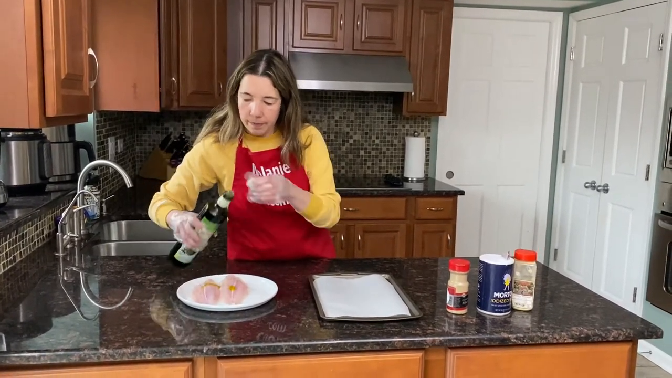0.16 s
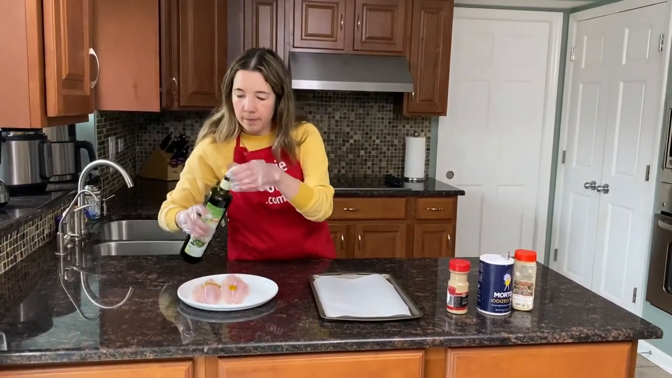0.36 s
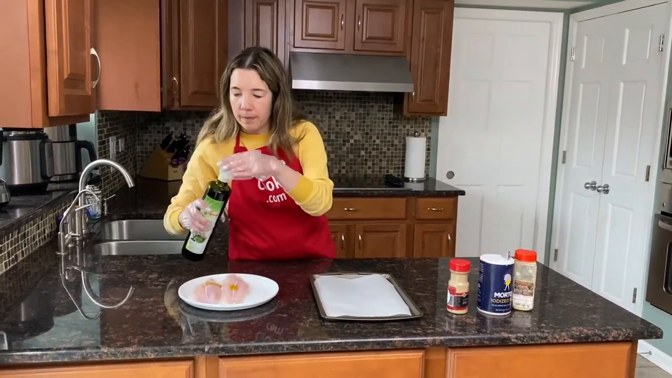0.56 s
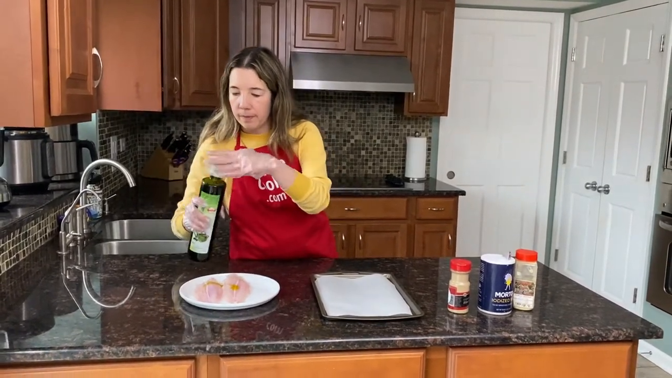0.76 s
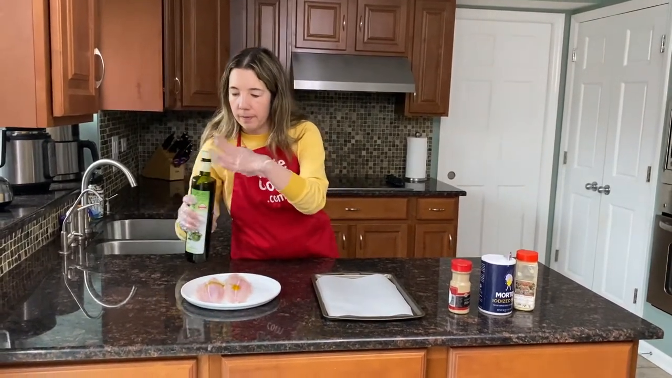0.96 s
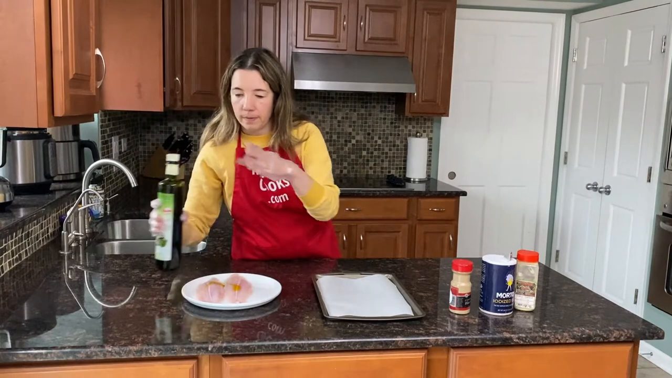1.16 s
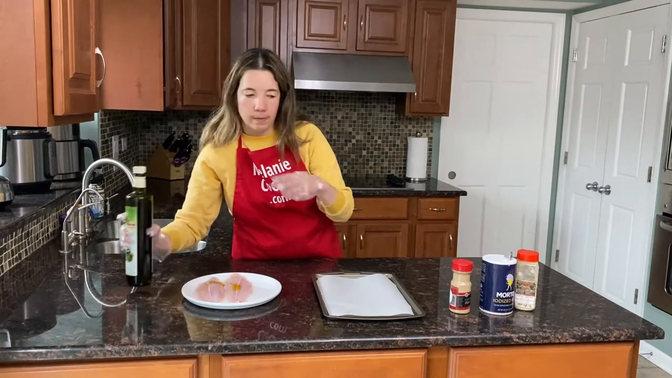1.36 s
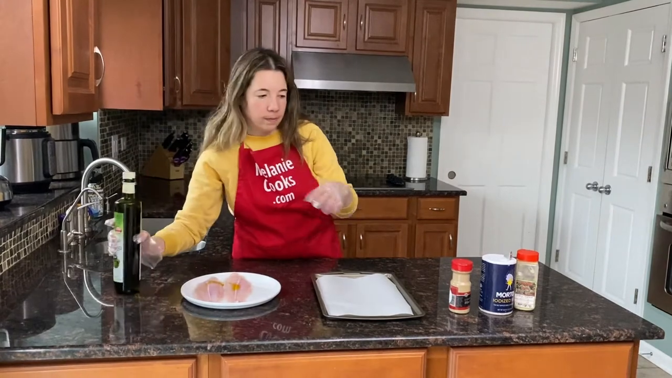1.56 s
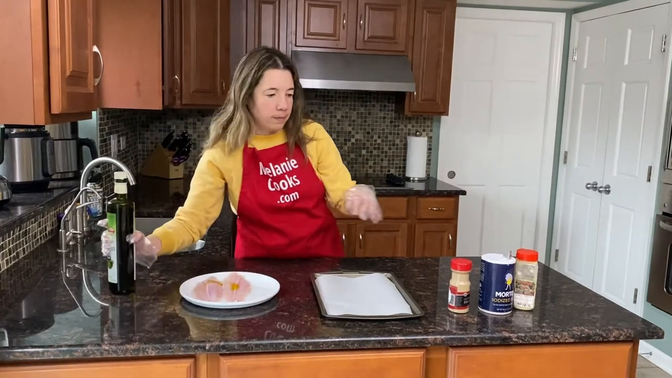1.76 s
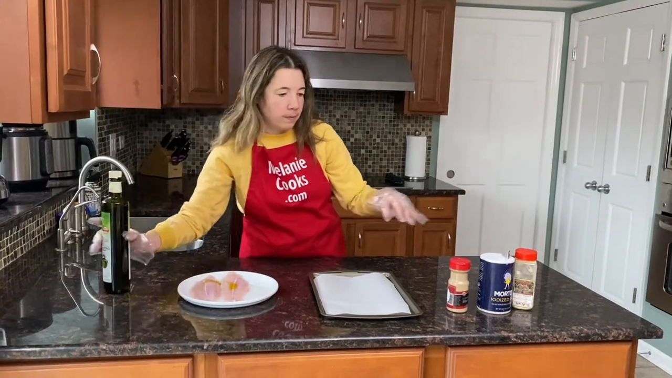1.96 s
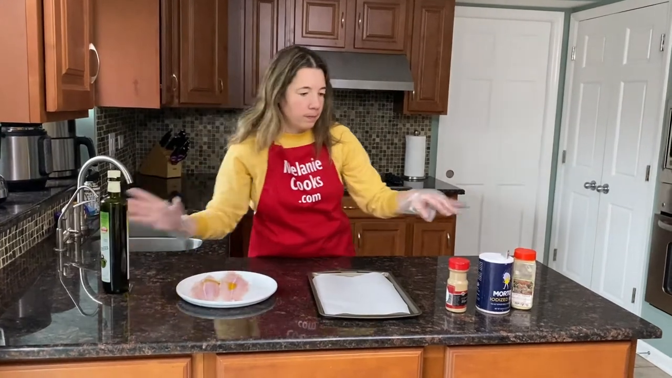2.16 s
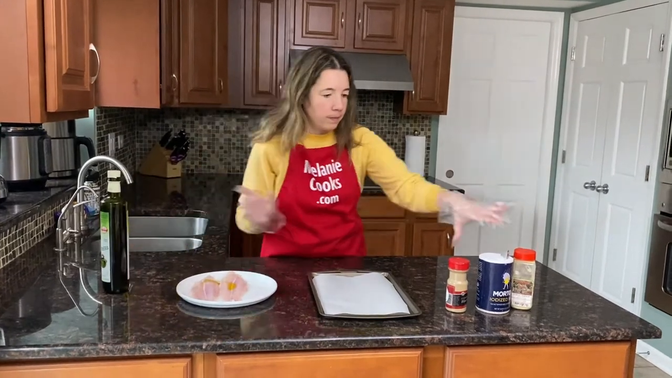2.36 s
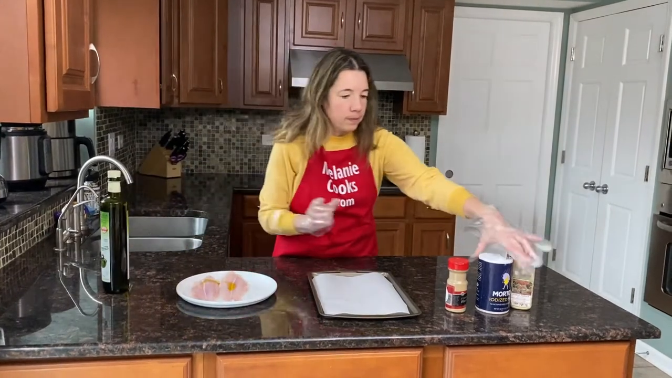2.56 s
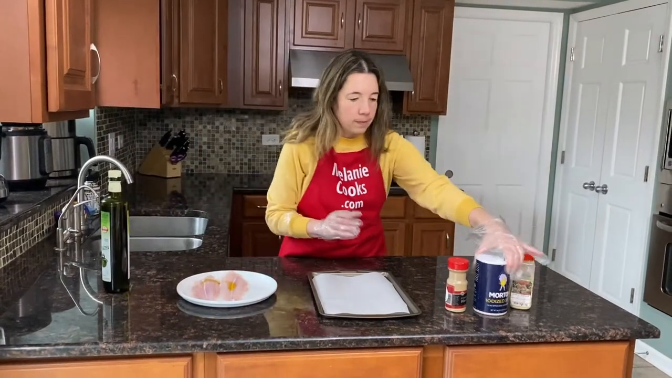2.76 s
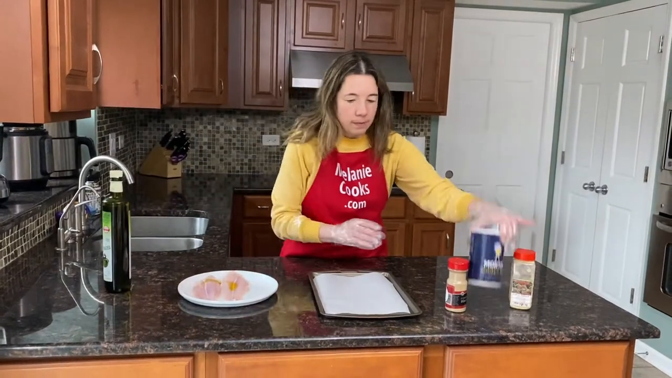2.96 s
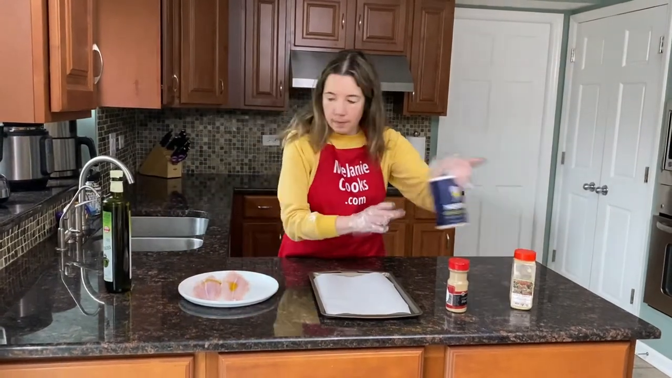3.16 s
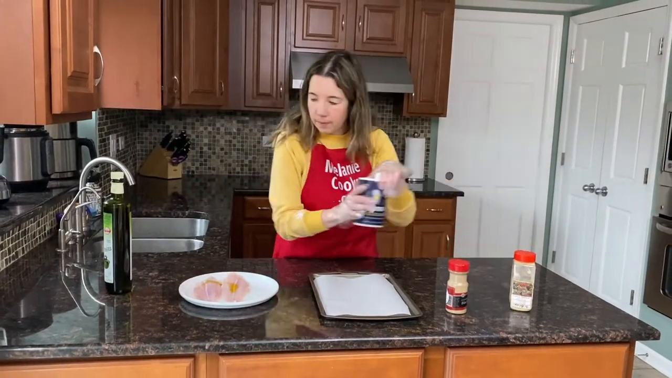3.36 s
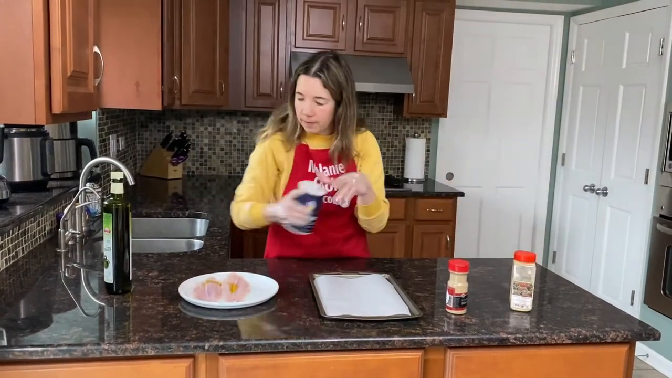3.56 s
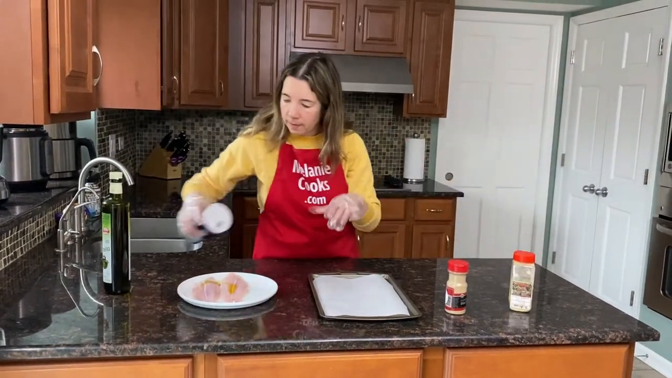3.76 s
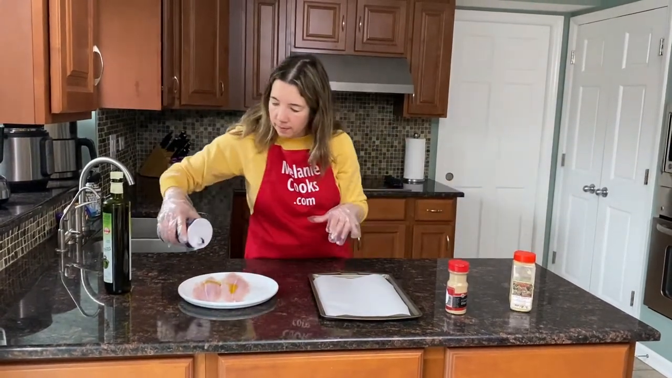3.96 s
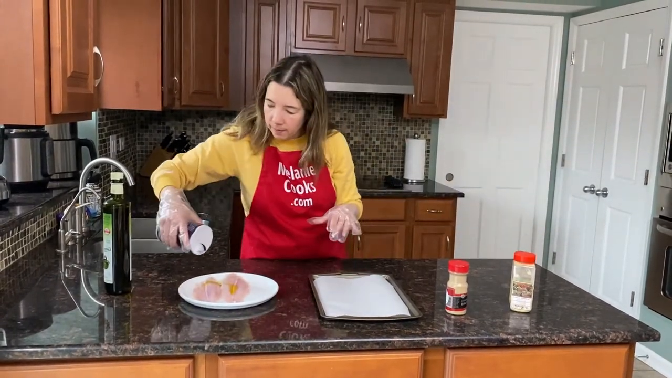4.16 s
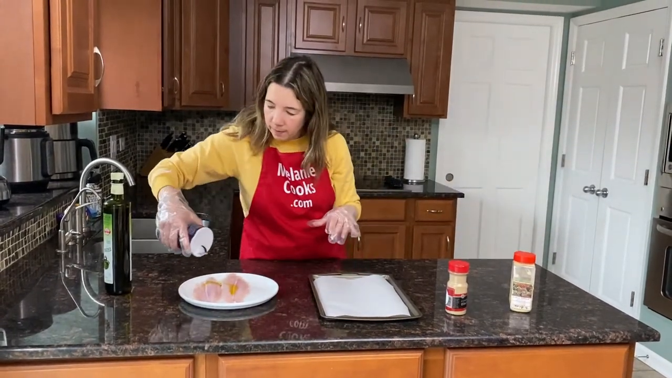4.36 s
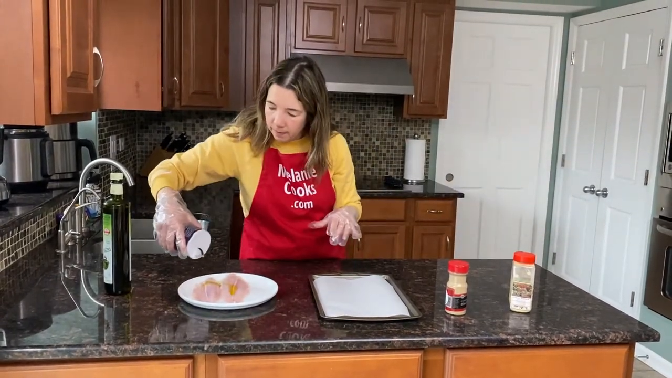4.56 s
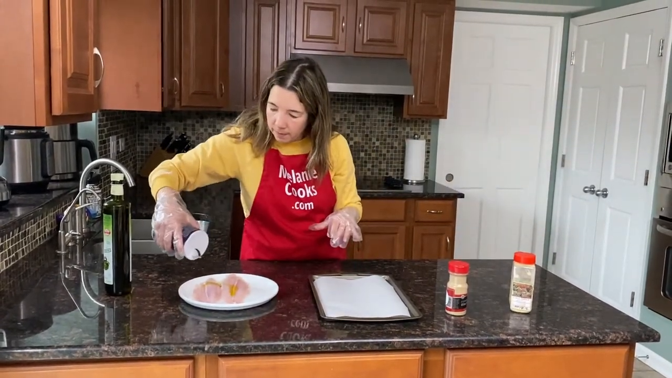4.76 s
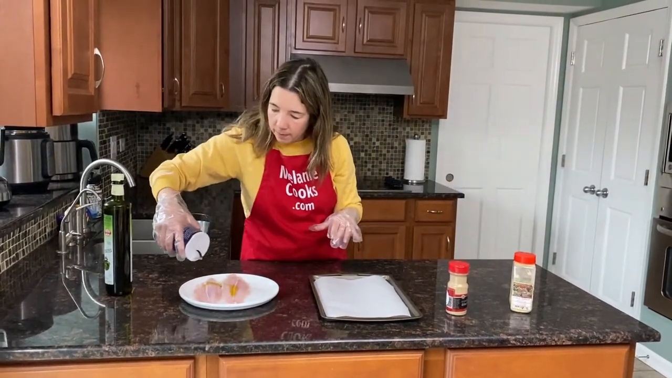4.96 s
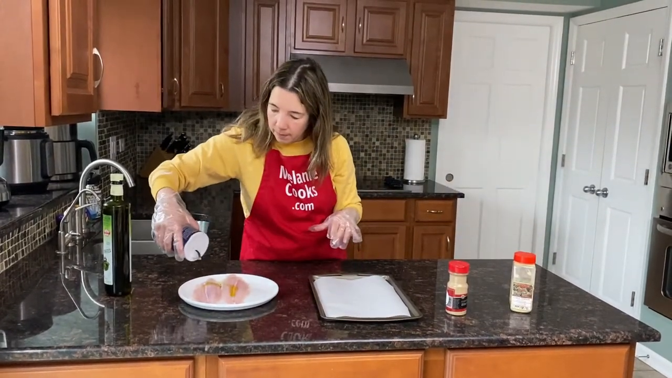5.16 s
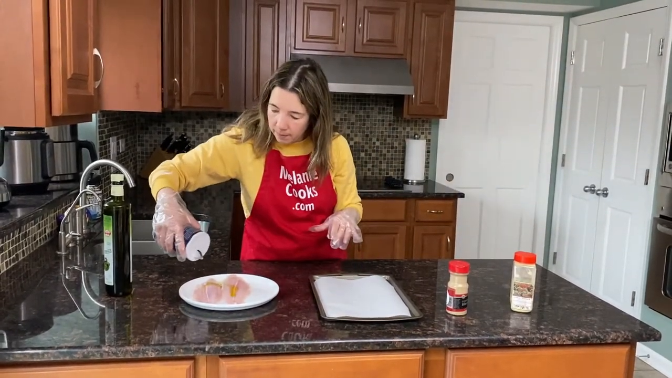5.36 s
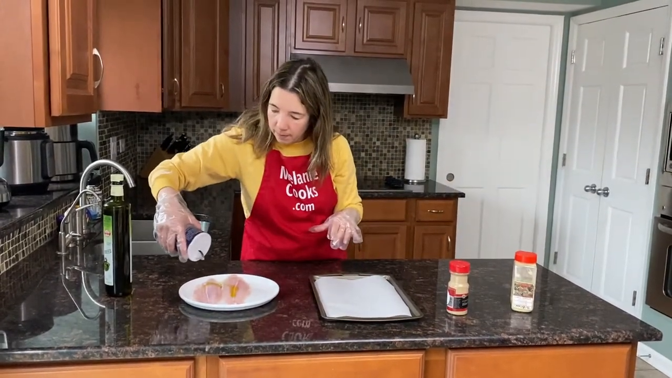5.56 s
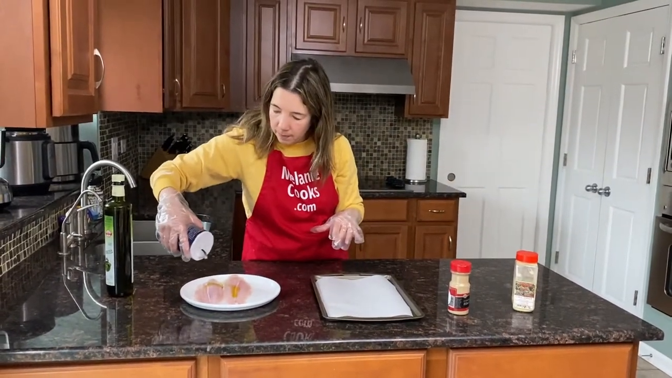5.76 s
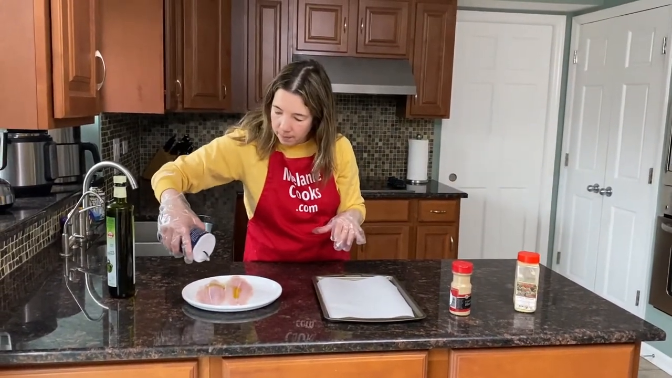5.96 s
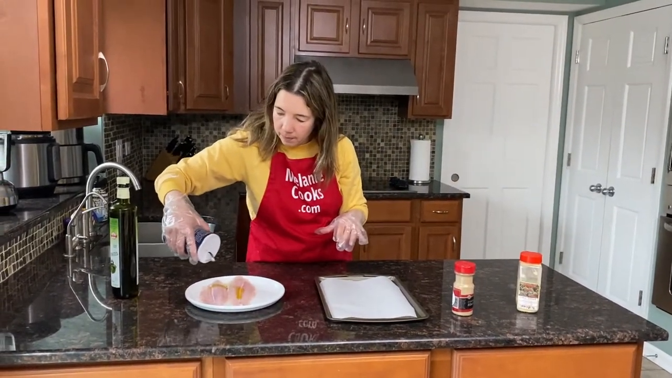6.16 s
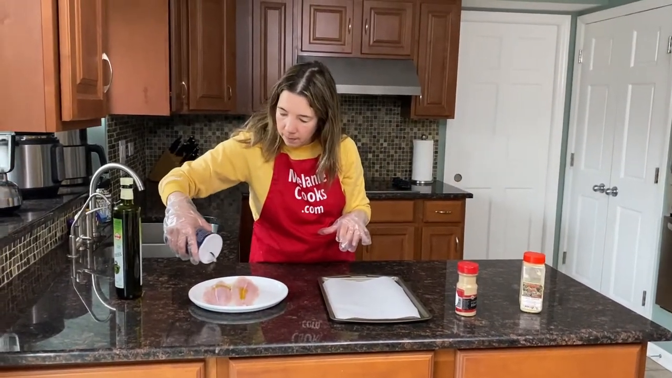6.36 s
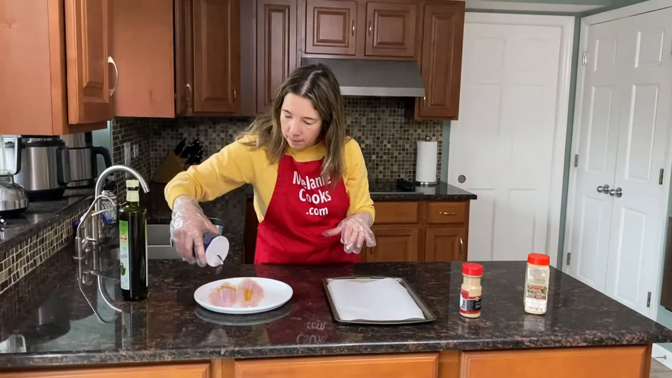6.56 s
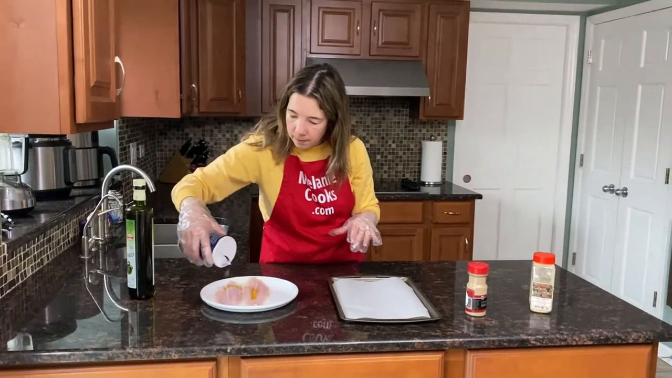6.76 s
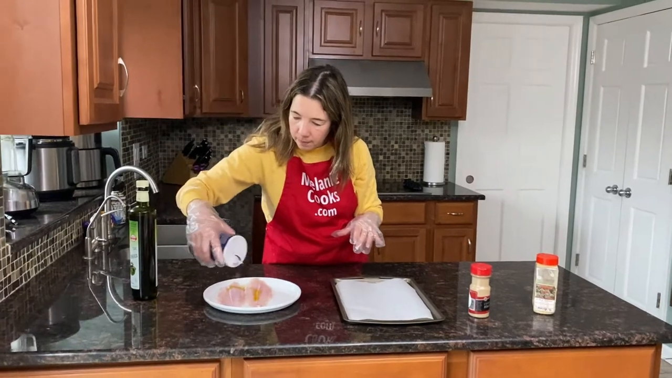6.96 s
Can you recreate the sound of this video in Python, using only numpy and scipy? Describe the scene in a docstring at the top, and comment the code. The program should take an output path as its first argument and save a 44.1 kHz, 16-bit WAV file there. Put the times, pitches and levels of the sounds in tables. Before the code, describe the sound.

A bottle cap scrapes faintly on its thread among soft clothing sounds. Then the glass bottle is set down on a stone counter, clunking and rattling to a stop with a short kitchen echo, by far the loudest event. Sleeves swish, plastic gloves snap lightly and a cardboard canister is picked up. Salt then sprinkles in small, rapid shakes over a faint fridge hum.

```python
"""A fridge hums in a kitchen throughout. Sleeves rustle and thin plastic gloves crackle as a cap is
twisted onto a glass oil bottle. At 1.5 s the bottle lands on a stone worktop and rocks to rest: glass
and stone ring, and the cabinet below booms. With more rustling, fingers bump a cardboard salt canister
and pick it up. From about 4.4 s, flicks of the wrist shake salt over food in small, hissing spurts."""
import sys
import numpy as np
from scipy import signal
from scipy.fft import rfft, irfft, next_fast_len
from scipy.io import wavfile
from scipy.ndimage import map_coordinates

SR = 44100
rng = np.random.default_rng(int(sys.argv[2]) if len(sys.argv) > 2 else 0)


def wrap_up_sound(samples):
    """Save the sound to the file named by the first command line argument, as 16-bit audio."""
    columns = np.atleast_2d(samples).T
    # keep every value between -1 and 1, then stretch to whole-number steps
    tamed = np.clip(columns, -1, 1)
    steps = np.round(tamed * 32767).astype(np.int16)
    wavfile.write(sys.argv[1], SR, steps)


N = 309863

# Levels in dB are relative. A fade time is how long a sound takes to drop by 60 dB.
# The bottle hits the stone. Each row: time in seconds, level in dB, treble cutoff in Hz, clatter in dB.
BOTTLE_HITS = [(1.5067, -32.5, 6000, 15.5), (1.508, -24, 1500, 4.5), (1.5120, -7.5, 850, 4),
               (1.5180, -20.5, 1290, 3), (1.535, -20, 950, 5), (1.573, -38, 800, 10),
               (1.7073, -27.5, 450, 9.5), (1.731, -31.5, 447, 14.5), (1.7781, -23, 870, 2),
               (1.8052, -29, 600, 6.5), (1.8379, -33, 650, 9)]
# Ringing tones. Each row: pitch in Hz, level in dB, fade time in seconds.
WORKTOP_TONES = [(137, -19, 0.62), (185.2, -11, 0.37), (229.5, -14, 0.38), (271.7, -12.5, 0.31),
                 (299.8, 2, 0.15), (367, -11, 0.39), (410, -23, 0.39), (466, -16, 0.29), (506, -15.5, .35),
                 (570, -20, 0.44), (620, -12.5, 0.4), (719, -14.5, 0.31), (768, -14, .32), (818, -23, 0.27),
                 (994, -19, 0.34), (1098, -23, 0.21), (1370, -10, 0.2), (1452, -14, 0.25),
                 (1733, -15, 0.27), (1920, -12, 0.16), (2060, -20, .3), (2600, -21, .25), (3214, -4, 0.073),
                 (4330, -8, 0.089), (5120, -16, .2)]  # bottle and slab together
RIM_TONES = [(303, 0.5, 0.025), (456, -9, 0.44), (514, -8, 0.17), (958, -24.5, .05), (1660, -28, 0.34),
             (1885, -29, .1)]  # set off by the rolling rim
CABINET_TONES = [(54.6, -34, 0.56), (72.4, -32, 0.45), (99.7, -25.5, 0.21), (124.6, -22, 0.2)]
GLASS_TONES = [(3170, -60, .12), (4350, -46, 0.05), (4370, -48, 0.038), (5100, -51, .04), (5480, -54, .03),
               (8400, -43, 0.035)]
# Short swells of sound. Each row: time of the peak in seconds, level in dB, length in seconds.
RIM_ROLLS = [(1.712, -32, .012), (1.74, -25.5, 0.033), (1.785, -33, 0.016), (1.806, -23, 0.016),
             (1.843, -30.5, 0.011)]
CAP_TWISTS = [(.572, -48, 0.018), (.635, -51, 0.051)]
CANISTER_BUMPS = [(2.62, -61, .08), (2.765, -46, 0.081), (3.355, -54.5, 0.047), (4.035, -62, 0.034),
                  (6.24, -67, 0.04)]
# An arm drags its sleeve. Each row: start, rise time and length in seconds, level in dB, rubbing in dB.
ARM_MOVES = [(-.02, 0.027, 0.2, -53, 1), (0.29, 0.017, 0.043, -57.5, 0), (0.407, 0.015, 0.092, -57.5, 0),
             (0.506, 0.062, 0.29, -48, -0.5), (0.749, .1, 0.22, -47.5, 0.5), (1.105, .03, 0.09, -57.5, -17),
             (1.278, 0.061, 0.11, -53, -8), (1.9, .13, .18, -44.5, 0), (2.242, 0.11, 0.24, -43, -2),
             (2.549, 0.029, 0.33, -44, -0.5), (2.68, 0.063, 0.071, -43, 0), (3.043, 0.11, 0.243, -47, -0.5),
             (3.319, 0.016, .17, -41, 0), (3.485, 0.085, 0.17, -46.5, 0.5), (3.71, 0.032, 0.18, -54, 0),
             (3.99, .03, 0.074, -55, 6.5), (4.07, 0.045, 0.054, -54, -14), (4.186, 0.029, 0.31, -58, -2)]
# A glove crease snaps. Each row: start in seconds, level in dB.
GLOVE_SNAPS = [(0.3176, -40.5), (0.417, -39), (1.3285, -39), (1.4344, -38), (3.3362, -27), (3.7203, -34),
               (3.7387, -32), (3.846, -38), (3.9943, -37), (4.0082, -39), (5.9806, -41), (6.1923, -41.5)]
# How fast the wrist shakes. Each row: time in seconds, flicks per second.
SHAKE_SPEED = [(5.0, 8.88), (5.7, 9.4), (6.3, 8.5), (6.45, 10.8)]
# Loudness over time. Each row: time in seconds, level in dB.
SALT_FLOW = [(4.47, -57.5), (4.68, -64.5), (4.92, -55.5), (5.25, -58), (5.46, -62.5), (5.57, -56),
             (5.69, -78), (5.8, -74), (5.91, -63.5), (6.01, -56.5), (6.25, -54), (6.45, -65), (6.55, -60.5),
             (6.72, -69), (6.85, -57), (7.02, -64.5)]
FRIDGE_WHINE = [(.9, -77), (1.35, -62), (2.2, -67.5), (4.7, -69), (4.87, -60), (5.05, -75), (6.0, -66),
                (6.7, -75)]
# The tones of the fridge's hum. Each row: pitch in Hz, level in dB.
FRIDGE_HUM = [(53.8, -81), (236.9, -72.5), (290.7, -77), (678.3, -72)]
# The tone colour of each noise. Each row: frequency in Hz, level there in dB.
CLATTER_COLOUR = [(40, -40), (110, -24), (220, 2.5), (350, -2), (650, 0.5), (1050, -4.5), (1400, -3.5),
                  (2200, -12.5), (4000, -24), (8000, -18), (15000, -15.5)]
SALT_COLOUR = [(500, -33), (1500, -7.5), (3000, -5), (5000, -5), (7200, -1), (9000, -4.5), (12000, 0.5),
               (14500, -6), (16000, -17)]
CLOTH_COLOUR = [(100, -10), (200, -4.5), (450, -5.5), (800, -3), (1100, -3), (1700, -3), (2200, -2.5),
                (3300, -4), (4500, -2.5), (7000, -2), (12500, 0), (14500, -2.5), (16000, -18)]
GLOVE_COLOUR = [(300, -13), (1500, -4), (4000, -7), (8000, -3), (13000, 6.5), (16000, -13)]
CAP_COLOUR = [(700, -37), (1200, -3), (1600, 6), (2100, -7), (2900, -5), (5000, -28)]
CANISTER_COLOUR = [(60, -9), (130, -12), (190, 17), (280, -6), (600, -4), (1500, -31), (4000, -11)]
AIR_COLOUR = [(15, -37), (30, -19), (38, -2), (50, 2), (90, -4.5), (130, -2), (180, -9.5), (330, -4.5),
              (450, -10.5), (880, -10), (1050, -13.5), (2200, -25.5), (4000, -29.5), (12000, -28.5),
              (16000, -39)]
# How clatter and echo die away. Each row: frequency in Hz, fade time in seconds.
CLATTER_FADE = [(80, 0.34), (300, 0.49), (1000, 0.37), (3000, 0.53), (10000, 0.34)]
ROOM_FADE = [(80, 0.32), (300, 0.36), (1000, 0.79), (3000, 0.58), (10000, 0.39)]
# How alike left and right are. Each row: frequency in Hz, likeness from 0 (unrelated) to 1 (the same).
STEREO_LIKENESS = [(60, 0.86), (300, 0.78), (500, 0.31), (900, 0), (1500, 0.13), (2300, 0.38), (3500, 0.65),
                   (4400, 0.51), (5300, 0.24), (6500, 0.67), (8000, 1)]
# How far the right channel's wave runs ahead of the left. Each row: frequency in Hz, lead in radians.
RIGHT_LEAD = [(0, 0), (7300, 0), (8200, 1.4), (9000, 3.14), (10000, 4.6), (10900, 6.2), (11600, 6.4),
              (13300, 9.4), (14000, 10.6), (14700, 12.5)]


def bottle(ring_db=-4, clatter_db=-9, room_db=-10, scatter_db=2.5, slab_hz=160):
    """The base lands edge first, slaps flat, then rocks from rim to rim with softer blows."""
    out, t = np.zeros((2, N)), clock()[:SR // 2]
    hz, level, fade_s = np.transpose(WORKTOP_TONES)[:, :, None]
    # short waves reach left and right out of step
    skew = stereo_angle(hz) * (-1) ** np.arange(len(hz))[:, None]
    direction = np.where(hz > 400, rng.choice([-1, 1], hz.shape), 1)  # low tones all move with the blow
    tones = direction * fade(t, fade_s) * np.sin(2 * np.pi * hz * t + np.array([skew, -skew]))
    for start, db, cutoff_hz, loose_db in BOTTLE_HITS:
        # countless weaker tones of the worktop and what stands on it
        clatter = fade_by_pitch(noise(CLATTER_COLOUR, len(t)), CLATTER_FADE)
        ring = np.sum(amp(level + scatter_db * rng.standard_normal(hz.shape)) * tones, axis=1)
        blow = amp(ring_db) * ring + amp(clatter_db + loose_db) * clatter
        soften = signal.butter(2, cutoff_hz, fs=SR)  # a longer contact passes less treble
        add(out, start, amp(db) * signal.lfilter(*soften, blow))
    bass_cut = signal.butter(2, slab_hz, "high", fs=SR)  # the stiff slab gives off little bass
    out = signal.lfilter(*bass_cut, out) + rolling_rim()
    return out + amp(room_db) * room_echo(out.mean(axis=0)) + cabinet_boom()


def rolling_rim(roll_db=3):
    """Between blows the base rolls on its rim, feeding a few tones that swell and ring on."""
    push, out = amp(roll_db) * swells(RIM_ROLLS), np.zeros(N)
    for hz, db, fade_s in RIM_TONES:
        carry = fade(1 / SR, fade_s)  # the share left after one sample
        loudness = amp(db) * signal.lfilter([1 - carry], [1, -carry], push)
        out += loudness * np.sin(2 * np.pi * hz * clock() + .2 * wobble(80))
    return out


def cabinet_boom(start_s=1.526, rise_s=0.022):
    """The heavy cabinet under the slab takes the weight and is slow to get moving."""
    t = np.maximum(clock() - start_s, 0)
    return (1 - np.exp(-(t / rise_s) ** 2)) * ringing(CABINET_TONES, t)


def glass_ping(start_s=1.5065):
    """Glass meets stone: the bottle's wall rings for a moment before the oil and the hand still it."""
    return ringing(GLASS_TONES, np.maximum(clock() - start_s, 0))


def salt(first_flick_s=4.36, spurt_s=0.064, trickle_db=-73, flutter_db=0.86, spill_db=-12):
    """Each flick of the wrist slides crystals through the spout; a thin trickle runs in between."""
    t = clock()
    flicks = np.cumsum(curve(SHAKE_SPEED, t)) / SR
    flicks -= np.interp(first_flick_s, t, flicks)  # count from the first flick
    peak_times = np.interp(np.arange(int(flicks[-1]) + 1), flicks, t)
    spurts = swells([(s, curve(SALT_FLOW, s), spurt_s) for s in peak_times])
    pouring = np.clip((t - first_flick_s) / .1 + 1, 0, 1)
    trickle = pouring * np.hypot(amp(trickle_db), amp(curve(SALT_FLOW, t) + spill_db))
    loudness = np.hypot(spurts, trickle) * amp(flutter_db * wobble(50))
    return loudness * coloured(grains(per_second=2000, spread_db=3, share=0.2), SALT_COLOUR)


def sleeves(rustle_db=2, rub_db=-1, flutter_db=1.0, rub_hz=2800, sag_db_per_s=6.5, settle_s=0.094,
            stir_db=-57.5, stir_rub_db=3, stir_start_s=.5, stir_end_s=4.0):
    """Fibres catch and slip as an arm moves, slows and stops. Firm rubbing adds body below the hiss."""
    t = clock()
    settle = lambda end: np.exp(-np.maximum(t - end, 0) / settle_s)
    stir = amp(stir_db) * (t >= stir_start_s) * settle(stir_end_s)  # faint rustle between moves
    hiss_power, rub_power = stir ** 2, (stir * amp(stir_rub_db)) ** 2
    for start, rise, length, db, firm_db in ARM_MOVES:
        age = np.maximum(t - start, 0)
        drag = np.minimum(age / rise, 1) * amp(db - sag_db_per_s * age) * settle(start + length)
        hiss_power += drag ** 2
        rub_power += (drag * amp(firm_db)) ** 2
    fibres = coloured(grains(per_second=2500, spread_db=1.5, share=0.25), CLOTH_COLOUR)
    body = filtered(fibres, lambda hz: 1 / (1 + (hz / rub_hz) ** 4))
    hiss = np.sqrt(hiss_power) * (fibres - body)
    rubbing = amp(rub_db) * np.sqrt(rub_power) * body
    return amp(rustle_db + flutter_db * wobble(45)) * (hiss + rubbing)


def gloves(snap_db=-8, fade_s=0.044):
    """Creases in the thin plastic flip over with a short crackle."""
    out, t = np.zeros((2, N)), clock()[:SR // 4]
    for start, db in GLOVE_SNAPS:
        add(out, start, amp(db + snap_db) * fade(t, fade_s) * noise(GLOVE_COLOUR, len(t)))
    return out


def cap():
    """The cap scrapes on its thread as it is twisted on."""
    return swells(CAP_TWISTS) * coloured(grains(per_second=220, spread_db=2.5, share=0.51), CAP_COLOUR)


def canister():
    """Fingers bump the hollow cardboard canister."""
    return swells(CANISTER_BUMPS) * noise(CANISTER_COLOUR)


def fridge(hum_db=-1, waver_db=3, whine_hz=874, whine_waver_db=2, stray_radians=.7):
    """The fridge hums a little unsteadily, and its wavering whine comes and goes."""
    t, hum = clock(), np.zeros(N)
    for hz, db in FRIDGE_HUM:
        loudness = amp(db + hum_db + waver_db * wobble(10))
        hum += loudness * np.sin(2 * np.pi * hz * t + 1.5 * wobble(22))
    drift = stray_radians * np.array([wobble(40), wobble(40)]) + wobble(8.8)
    whine_db = curve(FRIDGE_WHINE, t) + whine_waver_db * wobble(8.8)
    return hum + amp(whine_db) * np.sin(2 * np.pi * whine_hz * t + drift)


def still_air(level_db=-57):
    """The kitchen's air makes a faint, low noise."""
    return amp(level_db) * noise(AIR_COLOUR)


def room_echo(sound, build_s=0.015):
    """Tiles and cupboards throw the sound back from all sides."""
    tail = spread(fade_by_pitch(rng.standard_normal((2, SR)), ROOM_FADE))
    tail *= 1 - np.exp(-clock()[:SR] / build_s)
    return signal.fftconvolve(sound[None], tail / np.linalg.norm(tail[0]), axes=1)[:, :N]


def amp(db):
    """Turns decibels into a number to multiply by."""
    return 10 ** (np.asarray(db) / 20)


def unit(x):
    """Scales a sound to an average power of 1."""
    return x / np.sqrt(np.mean(x ** 2) + 1e-20)


def clock():
    """The time of every sample, in seconds."""
    return np.arange(N) / SR


def curve(rows, at):
    """Reads between a table's rows along straight lines."""
    return np.interp(at, *np.transpose(rows))


def at_pitch(rows, hz):
    """Reads between a table's frequencies, with octaves evenly spaced."""
    row_hz, values = np.transpose(rows)
    return np.interp(np.log(hz + 1), np.log(row_hz + 1), values)


def wobble(per_second):
    """A smooth curve through so many random values a second."""
    return map_coordinates(rng.standard_normal(int(N * per_second / SR) + 4), [clock() * per_second])


def fade(t, fade_s):
    """Falls by 60 dB every fade_s seconds."""
    return np.exp(-np.log(1000) * t / fade_s)


def ringing(tones, t):
    """Pure tones that start together and die away."""
    return sum(amp(db) * fade(t, fade_s) * np.sin(2 * np.pi * hz * t) for hz, db, fade_s in tones)


def fade_by_pitch(pair, fade_times):
    """Lets each frequency die away at its own speed."""
    hz, t, bands = signal.stft(pair, SR, nperseg=256)
    bands *= fade(t, at_pitch(fade_times, hz)[:, None])
    return signal.istft(bands, SR, nperseg=256)[1][:, :pair.shape[1]]


def filtered(sound, response):
    """Multiplies each frequency in a sound by response(hz)."""
    length = sound.shape[-1]
    padded = next_fast_len(length + 8192)
    return irfft(rfft(sound, padded) * response(np.fft.rfftfreq(padded, 1 / SR)), padded)[..., :length]


def stereo_angle(hz):
    """An angle that grows as left and right become less alike."""
    return np.arccos(np.clip(at_pitch(STEREO_LIKENESS, hz), -1, 1)) / 2


def spread(pair):
    """Turns two unrelated signals into a sound that comes from all sides."""
    mid, side = filtered(pair, lambda hz: np.array([np.cos(stereo_angle(hz)), np.sin(stereo_angle(hz))]))
    return np.array([mid + side, mid - side])


def coloured(pair, colour):
    """Gives two signals a tone colour, a stereo spread and a power of 1."""
    return unit(spread(filtered(pair, lambda hz: amp(at_pitch(colour, hz)))))


def noise(colour, samples=N):
    """Smooth stereo noise with a tone colour."""
    return coloured(rng.standard_normal((2, samples)), colour)


def grains(per_second, spread_db, share):
    """Tiny uneven ticks carry a share of the power; the rest is a blur of countless smaller ones."""
    hits = rng.random(N) < per_second / SR
    sizes = amp(spread_db * np.clip(rng.standard_normal(N), -2, 2))
    ticks = unit(hits * sizes * rng.standard_normal((2, N)))
    return np.sqrt(share) * ticks + np.sqrt(1 - share) * rng.standard_normal((2, N))


def swells(rows):
    """A bell-shaped rise and fall for each row; their powers add up."""
    t = clock()
    return np.sqrt(sum(amp(db) ** 2 * np.exp(-(2 * (t - s) / length) ** 2) for s, db, length in rows))


def add(track, start_s, sound):
    """Mixes a sound into the track."""
    part = track[..., round(start_s * SR):][..., :sound.shape[-1]]
    part += sound[..., :part.shape[-1]]


def scene():
    """Everything together, with the bottle a touch to the right and the clothes a touch to the left."""
    landing = bottle() * amp([[-.3], [.3]]) + glass_ping()
    clothes = (sleeves() + gloves()) * amp([[.2], [-.2]])
    return landing + clothes + salt() + cap() + canister() + fridge() + still_air()


def record(dry, top_hz=15800):
    """Shifts left and right out of step in the high treble and cuts everything above top_hz."""
    def response(hz):
        half_lead = curve(RIGHT_LEAD, hz) / 2
        return np.exp(1j * np.array([-half_lead, half_lead])) * (hz < top_hz)
    return filtered(dry, response)


dry = scene()
out = record(dry)
wrap_up_sound(out)
```